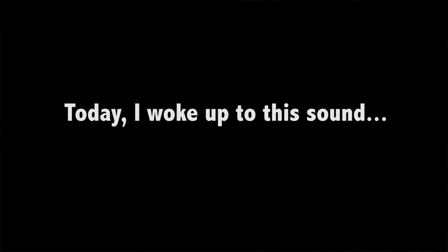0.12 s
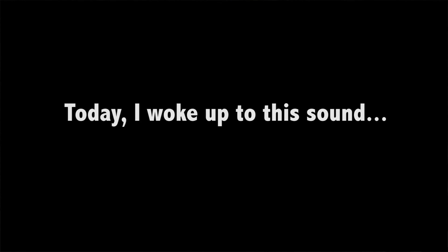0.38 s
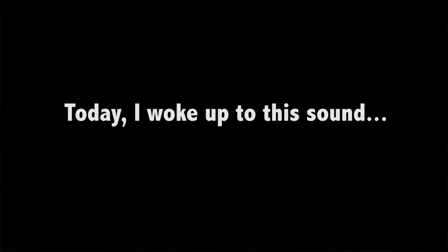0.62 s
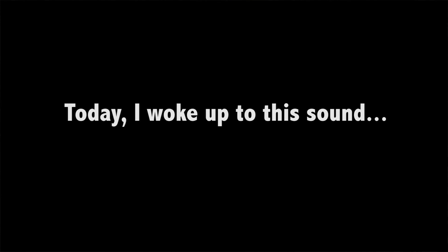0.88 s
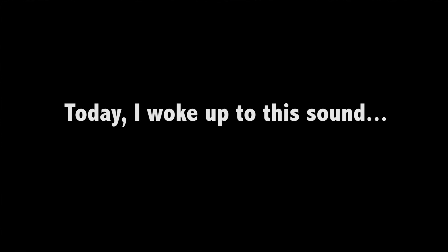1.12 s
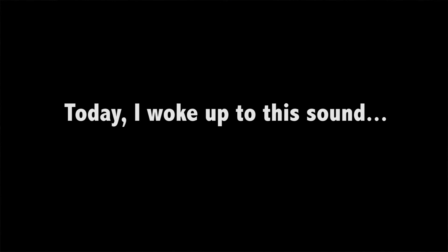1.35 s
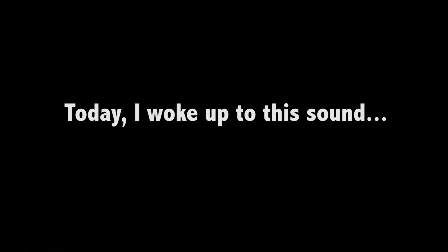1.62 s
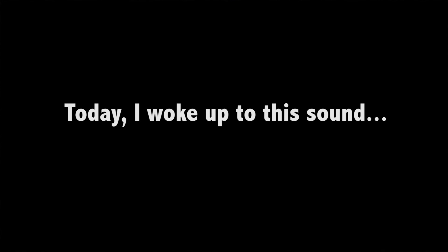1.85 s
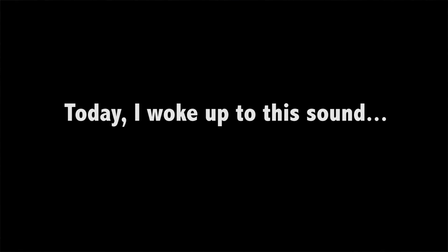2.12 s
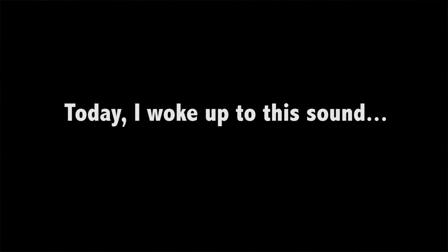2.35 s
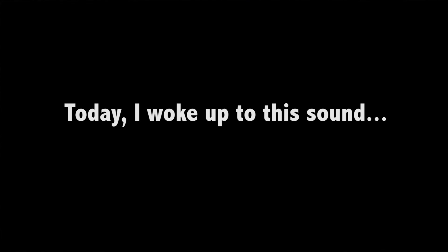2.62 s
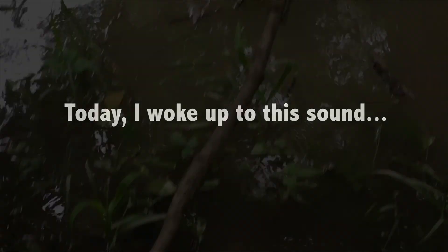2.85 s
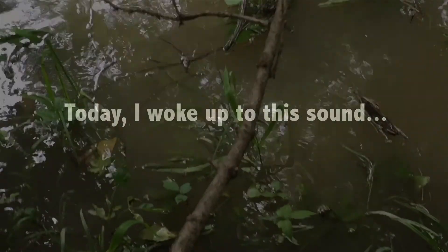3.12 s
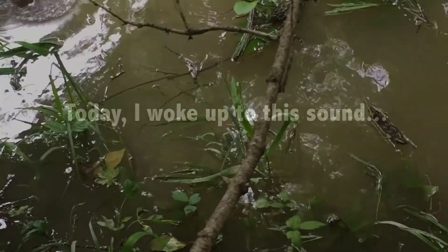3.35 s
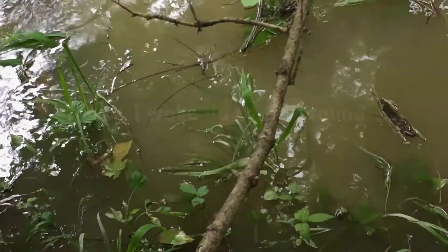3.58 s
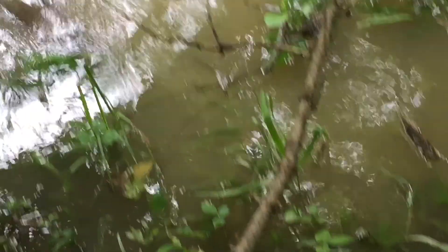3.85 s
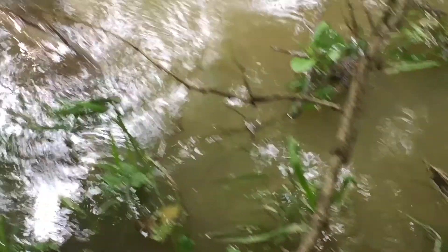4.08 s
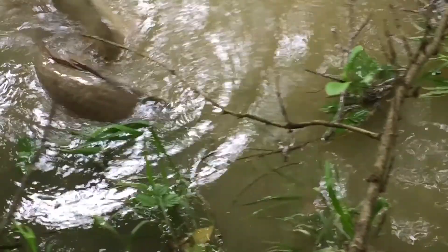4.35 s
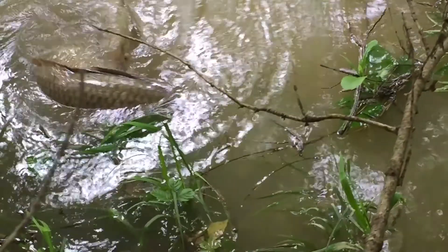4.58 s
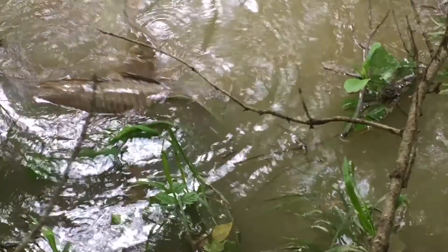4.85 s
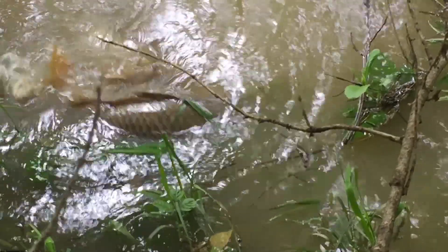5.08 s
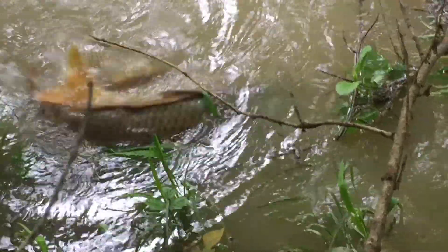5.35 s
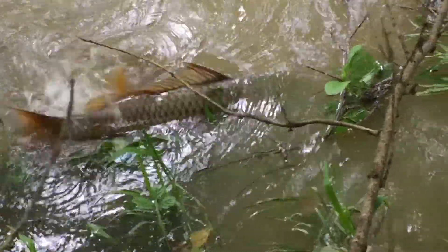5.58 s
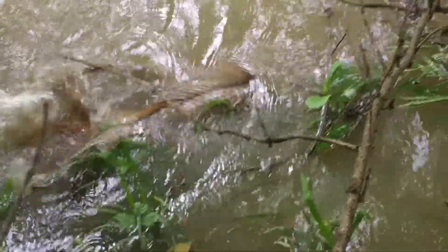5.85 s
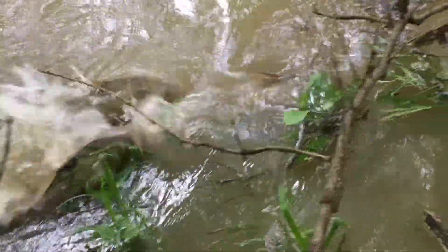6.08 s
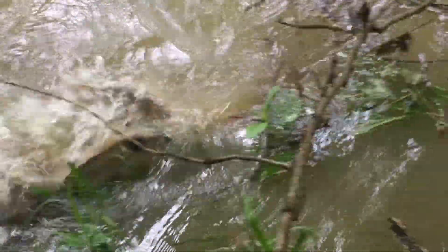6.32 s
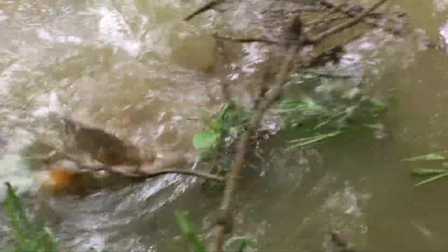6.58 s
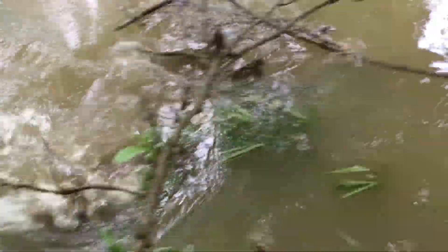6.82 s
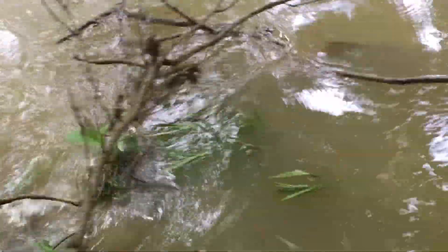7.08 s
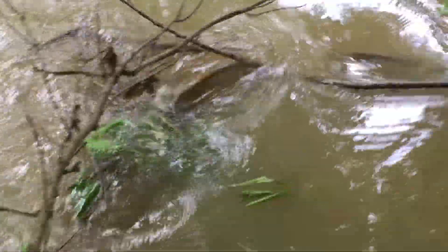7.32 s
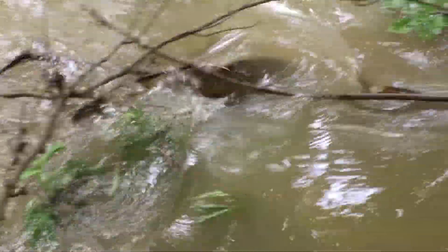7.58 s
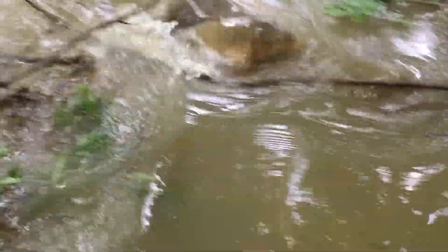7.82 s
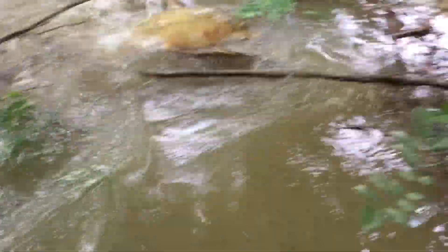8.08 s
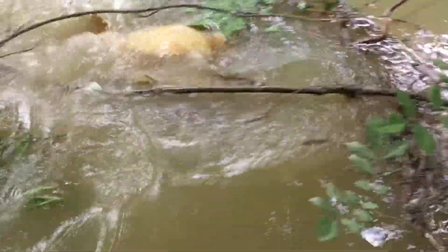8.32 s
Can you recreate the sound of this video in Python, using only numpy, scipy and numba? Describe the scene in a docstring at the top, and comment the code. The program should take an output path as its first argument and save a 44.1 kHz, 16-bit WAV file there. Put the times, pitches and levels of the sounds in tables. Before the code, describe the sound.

A big fish stirs shallow creek water a few metres from a small microphone. Soft swishes and bubbly plops come first, then a near-silent lull with low woodland rumble, stray drips and three faint distant bird notes. Small gurgles and ticks lead into splashes that swell into loud, churning thrashing, with sharp slaps, hollow popping bubbles and hissing spray, continuing until the end.

```python
"""A large fish thrashes in a shallow flooded creek, a few metres from a small microphone.
Throughout lie a low rumble and the faint hiss of the woods, both of filtered noise. From the start tail
strokes stir up froth and spray, made of swarms of tiny bubbles and hiss; trapped air pops and glides as
sines, and drops slap the surface as noise bursts. A far bird whistles in narrow noise early on; after
a lull the thrashing returns, far harder in the last few seconds."""
import sys
import numpy as np
from scipy import signal
from scipy.fft import rfft, irfft
from scipy.io import wavfile
from scipy.ndimage import uniform_filter1d
from numba import njit

SR = 44100
rng = np.random.default_rng(int(sys.argv[2]) if len(sys.argv) > 2 else 0)


def convert_level_to_amplitude(level_db):
    """Map a level in decibels to its linear amplitude factor."""
    exponent = np.asarray(level_db, float) / 20
    return 10 ** exponent


def log_audio(samples):
    """Write samples as a 16-bit WAV file to the path given in sys.argv[1]."""
    # one column per channel
    frames = np.atleast_2d(samples).T
    # limit to full scale, then quantise
    limited = np.clip(frames, -1, 1)
    pcm = np.round(limited * 32767).astype(np.int16)
    wavfile.write(sys.argv[1], SR, pcm)


N = 372204  # samples in the scene

# Tone of the woods' air noise: freq_hz, relative_db
WOODS_TONE = [(14, -31), (24, -12.5), (54, -2), (101, -2), (144, -11.5), (240, -19), (575, -20.5),
              (1800, -24), (3540, -30.5), (4170, -35), (15800, -47.5)]
WOODS_DB = -59  # rms
# Tone of broken water: freq_hz, relative_db
SPLASH_TONE = [(59, -60), (100, -17), (189, -19), (265, -16), (500, -4), (1320, -1), (1820, -0.5),
               (2550, -9), (3220, -4.5), (4920, -15), (5950, -11.5), (10500, -21.5), (13600, -21),
               (15800, -22.5)]
# Sweeps of tail and body: start_s (of the hold), hold_s, froth_db, spray_above_froth_db, gurgle_above_froth_db
STROKES = [(0.0, 0.12, -51, -6.5, -37), (0.284, 0.059, -56, -3.5, -29), (0.402, 0.063, -54.5, -8, -31),
           (0.53, 0.017, -52.5, -10, -27), (0.598, 0.095, -52.5, -7.5, -11), (0.72, 0.23, -60, -6, -0.5),
           (2.615, 0.14, -67, -8, -9), (2.9, 0.21, -82.5, 9.5, 1), (4.378, 0.16, -63.5, -3, -33),
           (5.119, 0.031, -50, -4, -21), (5.3, 0.037, -44, -7.5, -1.5), (5.44, 0.12, -50, -4.5, -32),
           (5.637, 0.075, -40, -2.5, -33), (5.782, 0.16, -46.5, 0.5, -2), (5.886, 0.092, -40, -3, -15),
           (6.051, 0.019, -44.5, -3.5, -28), (6.143, 0.26, -32.5, -3.5, -5), (6.454, 0.22, -35, -3, -12.5),
           (6.681, 0.058, -39.5, -0.5, -37), (6.883, 0.031, -38, -3, -22), (7.002, 0.29, -38.5, -3.5, -19),
           (7.394, 0.072, -50, 7, -42), (7.508, 0.2, -44, -9.5, -9.5), (7.684, 0.17, -36.5, -4, -8.5),
           (7.894, 0.12, -37, -4, -9.5), (8.077, 0.13, -43, -6.5, -25), (8.249, 0.23, -41, -5, -6.5)]
# Constant lapping beneath the strokes: froth_db, spray_db, gurgle_db
LAPPING_DB = -78, -81, -101
ATTACK_DB_PER_S, SAG_DB_PER_S = 330, 23  # before and during the hold
FROTH_FALL_DB_PER_S, SPRAY_FALL_DB_PER_S, GURGLE_FALL_DB_PER_S = 190, 133, 217  # after the hold
WASH_DB, WASH_FALL_DB_PER_S = -12, 42  # churned water settling, relative to its stroke
# Closed bubbles on nearly one pitch: start_s, pitch_hz, length_ms (of the glide), level_db (peak before flutter)
POPS = [(0.0349, 548, 18, -40.5), (.122, 2050, 18, -49), (.139, 1065, 32, -52), (0.342, 1645, 19, -44.5),
        (0.367, 1670, 16, -43), (0.3963, 1820, 2.6, -27.5), (.449, 600, 14, -47), (.577, 957, 16, -48),
        (0.6, 1500, 8.4, -36), (0.721, 490, 7.1, -41), (0.8329, 450, 18, -39), (0.9195, 1430, 6, -43),
        (2.812, 1424, 12.5, -43), (3.54, 1834, 12, -49.5), (4.3674, 1910, 6.5, -38.5),
        (4.399, 1000, 16, -42.5), (4.4915, 405, 91, -48.5), (5.389, 1330, 8.5, -33),
        (5.7095, 1600, 3.6, -19.5), (5.761, 705, 16, -37.5), (5.894, 900, 5.7, -22.5),
        (5.9287, 1700, 4.3, -21), (6.045, 980, 5.6, -26), (6.058, 1500, 4.4, -23), (6.119, 910, 4.8, -21),
        (6.158, 1610, 7.3, -25), (6.4063, 1810, 7.3, -23), (6.483, 2070, 8.9, -23.5),
        (6.6919, 1840, 13, -23), (6.9134, 1490, 2, -8.5), (6.9785, 575, 5.4, -21), (7.033, 526, 7.2, -22),
        (7.104, 743, 14, -29.5), (7.2777, 858, 10.5, -29), (7.372, 1930, 2.5, -24), (7.401, 1780, 3.4, -32),
        (7.41, 1680, 4, -24), (7.432, 1790, 5.4, -29), (7.544, 991, 12.5, -33.5), (7.774, 1400, 5, -20.5),
        (7.811, 1070, 7.6, -26.5), (7.841, 1540, 3.5, -27), (7.868, 870, 4, -24), (7.936, 837, 9.5, -24),
        (8.1594, 918, 16, -25.5), (8.2394, 394, 8.8, -28), (8.2823, 1610, 5.5, -20.5),
        (8.294, 1830, 3.9, -24.5)]
POP_RISE = 1.037  # pitch at the end of the glide over the first
# Open air pockets: start_s, first_pitch_hz, last_pitch_hz, length_ms (of the glide), level_db (peak before flutter)
POCKETS = [(0.0619, 730, 890, 17, -51), (0.2898, 465, 575, 9.4, -46), (0.302, 990, 1290, 7.1, -42.5),
           (0.625, 603, 895, 26, -44.5), (0.701, 1440, 1750, 5.6, -43), (0.777, 232, 435, 58, -50),
           (0.8581, 594, 780, 21, -46.5), (1.532, 1450, 1190, 6.3, -41.5), (1.5766, 314, 1004, 53.5, -46),
           (2.918, 530, 727, 34, -43.5), (3.111, 1250, 1720, 18, -51), (3.81, 670, 1340, 17.5, -44.5),
           (4.409, 615, 767, 59, -41.5), (4.462, 980, 1370, 32, -44), (4.609, 850, 1227, 29, -46),
           (4.9478, 736, 1256, 29, -40.5), (5.0106, 655, 970, 16, -44.5), (5.0693, 880, 1620, 16, -36.5),
           (5.0962, 505, 404, 50, -43), (5.17, 980, 1230, 5.3, -27), (5.179, 1250, 1940, 27, -42),
           (5.273, 880, 2170, 44, -37.5), (5.3182, 243, 880, 67.4, -31.5), (5.4432, 477, 705, 18.6, -37),
           (5.555, 690, 980, 18, -38.5), (5.67, 644, 940, 15.5, -27), (6.8882, 1730, 1440, 9.9, -17.5),
           (6.9155, 1320, 1020, 4.8, -15.5), (6.995, 244, 313, 42, -38), (7.01, 314, 480, 29.3, -37.5),
           (7.156, 1360, 1960, 14, -36), (7.3395, 1830, 1430, 16, -28.5), (7.409, 273, 321, 210, -59),
           (7.652, 230, 325, 16.5, -32.5), (7.659, 755, 642, 11, -22), (8.345, 480, 760, 38, -39.5)]
# Drops and fins smacking the surface: start_s, peak_db, centre_hz
SLAPS = [(0.397, -42.5, 3970), (0.5754, -48, 4600), (0.597, -42, 3850), (1.5264, -46.5, 3450),
         (2.7427, -53, 2980), (2.9152, -44, 1600), (2.973, -45.5, 4930), (3.008, -42.5, 7700),
         (3.6067, -53, 3850), (3.664, -50, 2500), (4.303, -46, 3470), (4.365, -49, 6000),
         (4.461, -41, 3200), (5.075, -36, 2580), (5.166, -39, 3320), (5.232, -40.5, 5940),
         (5.443, -25, 4900), (5.4807, -28.5, 3030), (5.5493, -30, 2940), (5.978, -24.5, 5100),
         (6.132, -22.5, 3100), (6.182, -21.5, 3080), (6.6919, -25, 3550), (6.747, -24, 4400),
         (6.834, -26, 3360), (6.9119, -20.5, 3500), (7.139, -30, 3070), (7.513, -26.5, 2670),
         (7.5462, -33, 3870), (7.7754, -24, 2900), (8.3467, -26, 3100)]
# Distant bird notes: start_s, length_s (fade to 1/e), pitch_hz, level_db (rms before the fade)
WHISTLES = [(1.07, .12, 2775, -72), (1.975, .09, 3460, -71), (2.252, .08, 2480, -68)]


def level(x, db):
    """Scale to an rms level, or to a level curve over time."""
    return x * convert_level_to_amplitude(db) / np.sqrt(np.mean(x ** 2))


def colour(x, points):
    """Minimum-phase filter through (Hz, dB) points, so that no sound precedes its cause."""
    hz, db = np.transpose(points)
    grid_hz = np.maximum(np.arange(4097) * SR / 8192, 1)
    log_gain = np.interp(np.log(grid_hz), np.log(hz), db) * np.log(10) / 20
    # folding the cepstrum onto positive time makes the filter causal
    cepstrum = irfft(log_gain)
    cepstrum[1:4096] *= 2
    cepstrum[4097:] = 0
    impulse = irfft(np.exp(rfft(cepstrum)))
    return signal.fftconvolve(x, impulse)[:N]


def band(x, lo_hz, hi_hz):
    """Steep band-pass."""
    return signal.sosfilt(signal.butter(3, [lo_hz, hi_hz], "band", fs=SR, output="sos"), x)


def walk(rate_hz):
    """Random levels held 1 / rate_hz s and slewed twice; spread near 1."""
    hold = int(SR / rate_hz)
    steps = np.repeat(rng.standard_normal(N // hold + 1), hold)
    return 2.02 * uniform_filter1d(uniform_filter1d(steps, hold), hold)[:N]


def woods():
    """Distant wavering rumble, with a soft and steadier hiss above it."""
    air = colour(rng.standard_normal(N), WOODS_TONE)
    rumble = signal.sosfilt(signal.butter(2, 160., fs=SR, output="sos"), air)
    hiss = air - rumble
    return level(rumble * convert_level_to_amplitude(2.72 * walk(14.0)) + hiss * convert_level_to_amplitude(.5 * walk(4.8)), WOODS_DB)


@njit
def ring(start, hz, cycles, glide, size, onset, out_len):
    """Small bubbles: each a sine that sets in, dies, and climbs in pitch as it nears the surface."""
    out = np.zeros(out_len)
    for k in range(len(start)):
        span = cycles[k] * SR / hz[k]  # samples to fall to 1/e, but for the onset
        z, wait = size[k] + 0j, 1.
        turn = np.exp(2j * np.pi * hz[k] / SR - 1 / span)
        bend = np.exp(2j * np.pi * hz[k] / SR * glide[k] / span)
        opening = np.exp(-1 / (onset * span))
        for i in range(start[k], min(start[k] + int(4 * span), out_len)):
            out[i] += z.imag * (1 - wait)
            z *= turn
            turn *= bend
            wait *= opening
    return out


def swarm(per_s, lo_hz, hi_hz, cycles, scatter_db, glide):
    """A cloud of bubbles of all sizes in a range; some are much stronger than the rest."""
    when, pitch, length, strength, bend = rng.random((int(per_s * N / SR), 5)).T
    start = (when * N).astype(np.int64)
    hz = lo_hz * (hi_hz / lo_hz) ** pitch
    size = hz / hi_hz * convert_level_to_amplitude(-scatter_db * np.log(1 - .96 * strength))
    return ring(start, hz, cycles * (0.5 + 1.58 * length), glide * bend, size, 0.057, N)


def stirred(above_db, fall_db_per_s, still_db):
    """Level in dB: strokes set in fast, sag while held, die away and leave a wash; powers add."""
    t = np.arange(0, N, 64) / SR
    power = convert_level_to_amplitude(still_db) ** 2
    for (s, hold, db, *_), above in zip(STROKES, above_db):
        after = np.maximum(t - s - hold, 0)
        attack = ATTACK_DB_PER_S * np.maximum(s - t, 0)
        sag = SAG_DB_PER_S * np.clip(t - s, 0, hold)
        stroke = convert_level_to_amplitude(db + above - (attack + sag + fall_db_per_s * after))
        wash = (t > s + hold) * convert_level_to_amplitude(db + above + WASH_DB - WASH_FALL_DB_PER_S * after)
        power = power + stroke ** 2 + wash ** 2
    return np.interp(np.arange(N) / SR, t, 10 * np.log10(power))


def thrashing():
    """Big pockets gurgle, froth bubbles, fine spray crackles; small gushes move them together."""
    *_, spray_above, gurgle_above = np.transpose(STROKES)
    froth_db = stirred(np.zeros(len(STROKES)), FROTH_FALL_DB_PER_S, LAPPING_DB[0])
    spray_db = stirred(spray_above, SPRAY_FALL_DB_PER_S, LAPPING_DB[1])
    gurgle_db = stirred(gurgle_above, GURGLE_FALL_DB_PER_S, LAPPING_DB[2])

    # hard thrashing merges into a roar; gentle stirring falls apart into single gushes and drops
    calm = np.clip((-34.5 - froth_db) / 23.3, 0, 1)
    gush = convert_level_to_amplitude((1.5 + 2.4 * calm) * walk(65.))

    gurgle = swarm(130., 113.2, 444.0, 1.8, 5.4, 0.227)
    loose_froth = swarm(800., 340.2, 2307.0, 5.57, 4.0, 0.179)
    dense_froth = swarm(3000., 431.0, 2470.0, 1.63, 1.2, 0.15)
    froth = level(loose_froth, 0) + (1 - calm) * level(dense_froth, -3.1)

    crackle = swarm(2500., 2287.0, 14720.0, 6.1, 1.6, 0.084)
    hiss = band(rng.standard_normal(N), 2500., 17000.)
    # thrown drops landing again: brief ticks
    drops = swarm(450., 2414.0, 13980.0, 4.6, 8.5, 0.046)
    spray = (1 - 0.16 * calm) * (level(crackle, 0) + level(hiss, -0.5)) + level(drops, -1.66)

    layers = [(gurgle * gush ** 1.35, gurgle_db),
              (froth * gush ** 0.49, froth_db),
              (spray * np.sqrt(gush), spray_db)]
    return sum(level(colour(x, SPLASH_TONE), db) for x, db in layers)


def bubbles():
    """Each pocket swells, slides in pitch as its opening changes, wobbles, and dies."""
    out = np.zeros(N + SR)
    wobble = 1 + 0.022 * walk(200.)
    closed = [(s, hz, hz * POP_RISE, ms, db) for s, hz, ms, db in POPS]
    for s, first_hz, last_hz, ms, db in POCKETS + closed:
        span = ms * SR / 1000
        u = np.arange(int(1.7 * ms * SR / 1000)) / span  # the glide ends at 1, the tail rings on
        hz = first_hz * (last_hz / first_hz) ** u
        # a closed bubble peaks early; a pocket that opens wide swells while its pitch climbs
        top = np.clip(0.2 + 0.6 * np.log(last_hz / first_hz), .05, .9)
        rise = np.sin(np.pi / 2 * np.minimum(u / top, 1)) ** 0.38
        fade = np.exp(-1.5 * (np.maximum(u - top, 0) / (1 - top)) ** 0.74)
        i = int(s * SR)
        phase = 2 * np.pi * np.cumsum(hz * wobble[i:i + len(u)]) / SR
        out[i:i + len(u)] += convert_level_to_amplitude(db) * rise * fade * np.sin(phase)
    flutter = convert_level_to_amplitude(1.6 * walk(220.))
    return out[:N] * flutter


def slaps():
    """A sharp crack, then a short fizz of broken water; small drops tick in a narrow band."""
    out = np.zeros(N + SR)
    t = np.arange(2000) / SR
    noise = rng.standard_normal((len(SLAPS), len(t)))
    for (s, db, hz), fizz in zip(SLAPS, noise):
        burst = fizz * (np.exp(-t / 0.0024) + 0.15 * np.exp(-t / 0.011))
        tick = band(burst, 0.847 * hz, 1.175 * hz)
        breadth = np.clip((db + 65) / 51.0, 0, 1)  # harder slaps break more water
        burst = tick + breadth * colour(burst, SPLASH_TONE)[:len(t)]
        i = int(s * SR)
        out[i:i + len(t)] += convert_level_to_amplitude(db) * burst / np.abs(burst).max()
    return out[:N]


def bird():
    """Thin broken notes of narrow noise, quick to set in and then fading."""
    t, out = np.arange(N) / SR, 0
    for s, length, hz, db in WHISTLES:
        u = np.maximum(t - s, 0) / length
        note = level(band(rng.standard_normal(N), .975 * hz, hz / .975), db)
        out = out + np.minimum(10 * u, 1) * np.exp(-u ** 2) * note
    return out


def banks(x):
    """A short scatter of echoes from banks and branches, as a decaying noise tail."""
    t = np.arange(int(.12 * SR)) / SR
    tail = band(rng.standard_normal(len(t)), 167.0, 4900.0) * np.exp(-t / 0.01) * (t > .003)
    tail = tail / np.sqrt(np.sum(tail ** 2))
    return x + convert_level_to_amplitude(-18.0) * signal.fftconvolve(x, tail)[:N]


def scene():
    """The fish's water sounds between the banks, over the woods and the bird."""
    water = thrashing() + bubbles() + slaps()
    return (woods() + banks(water) + bird())[None]


def band_limit(x):
    """A steep low-pass at the top of the band."""
    return signal.sosfilt(signal.butter(12, 15920, fs=SR, output="sos"), x)


def record(dry):
    """The microphone cuts the deepest bass and the top."""
    edges = signal.ellip(9, .2, 80, [36, 15800], "band", fs=SR, output="sos")
    mix = signal.sosfilt(edges, dry)
    return band_limit(mix)


dry = scene()
out = record(dry)
log_audio(out)
```